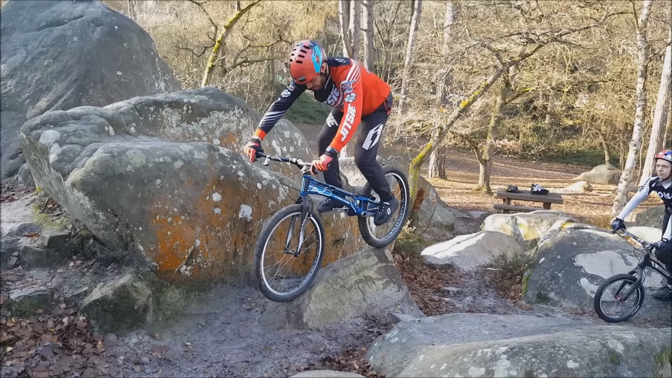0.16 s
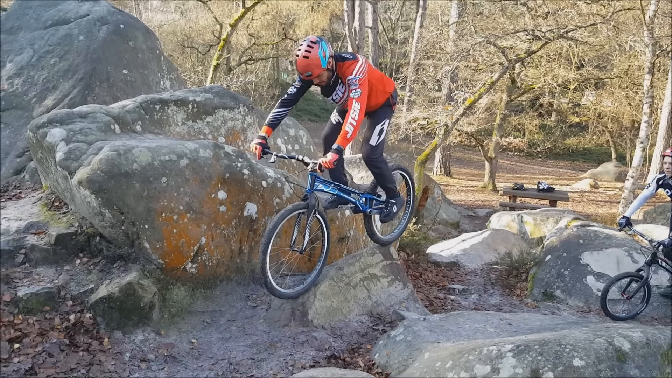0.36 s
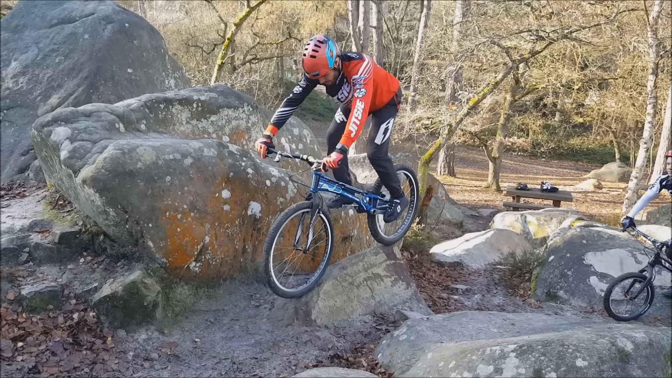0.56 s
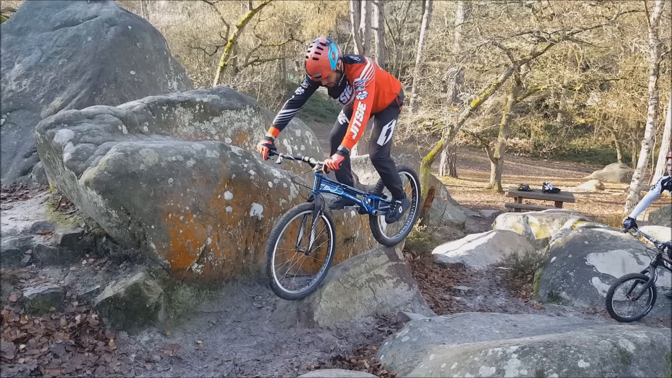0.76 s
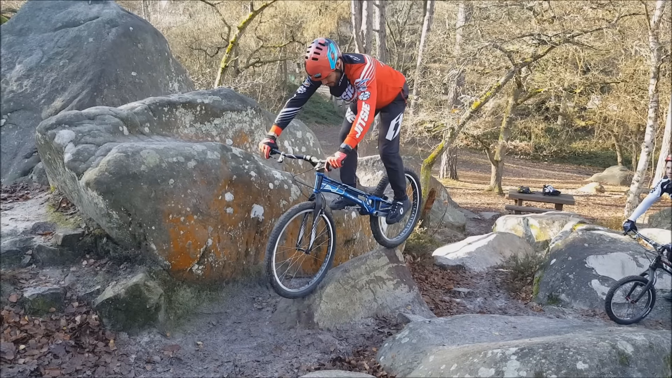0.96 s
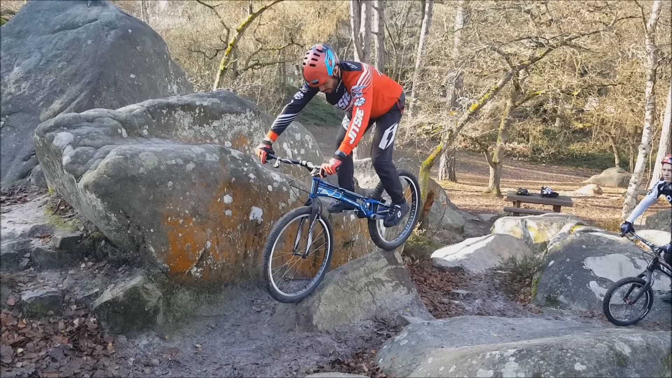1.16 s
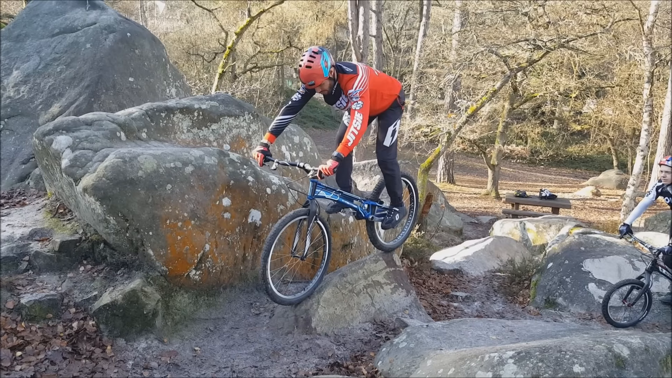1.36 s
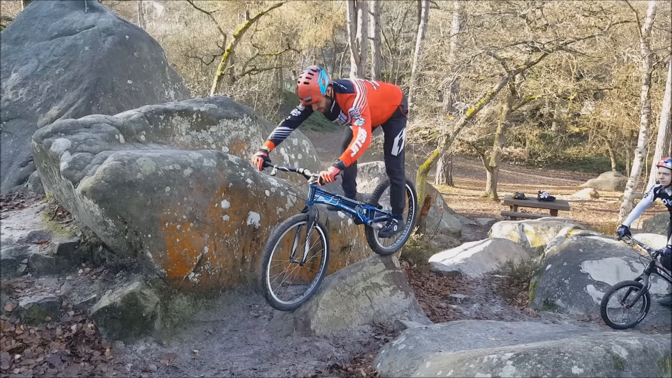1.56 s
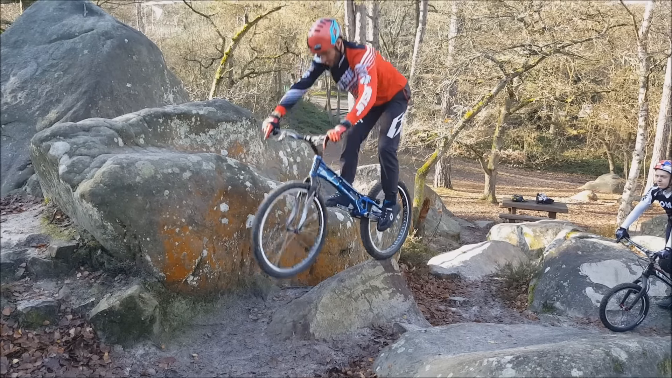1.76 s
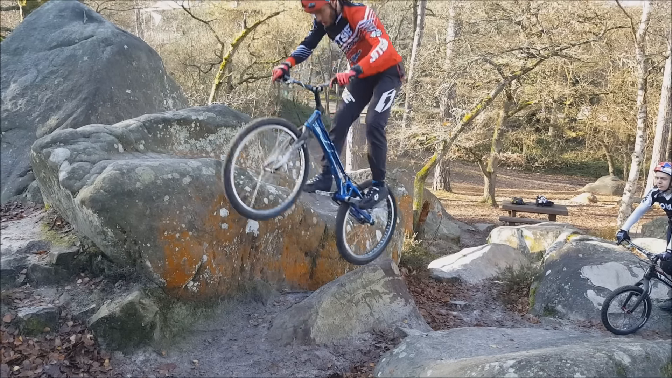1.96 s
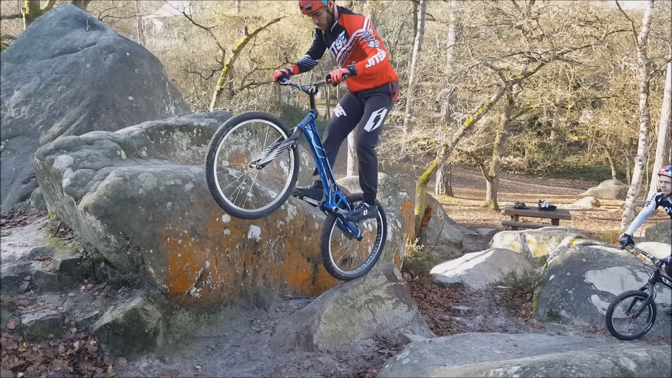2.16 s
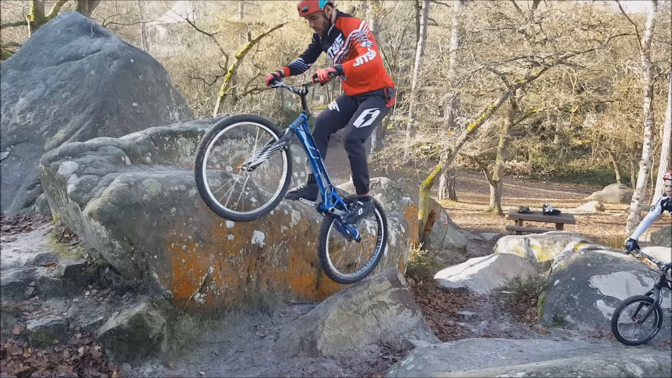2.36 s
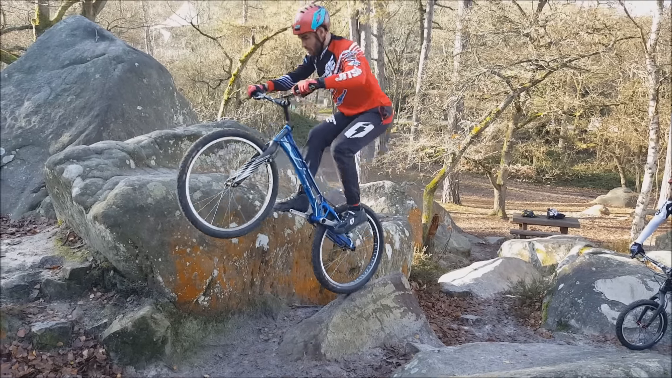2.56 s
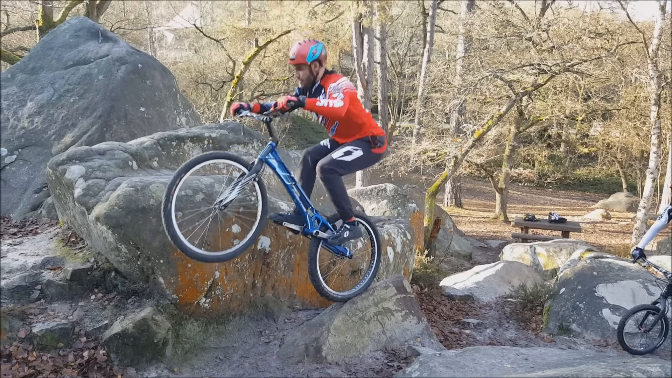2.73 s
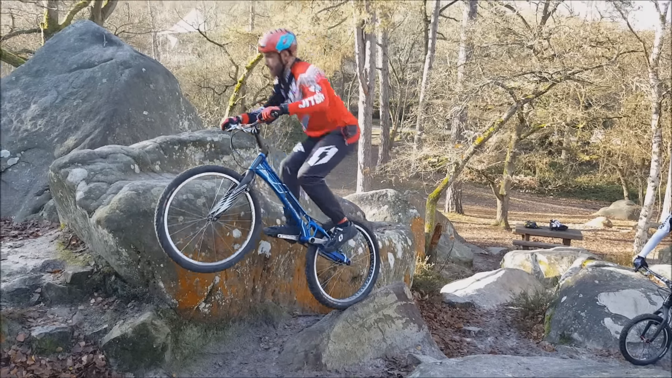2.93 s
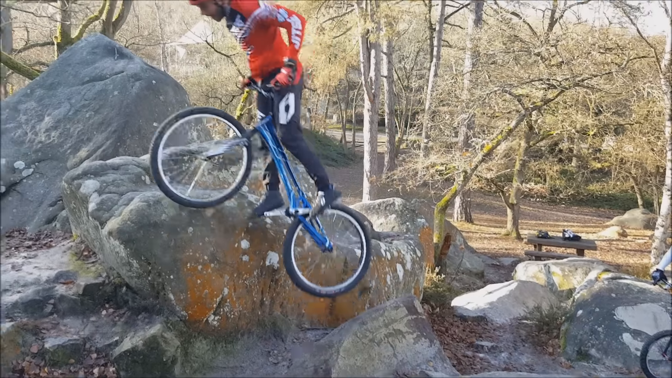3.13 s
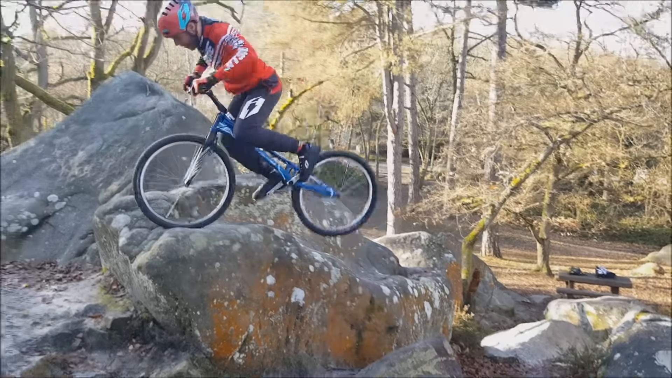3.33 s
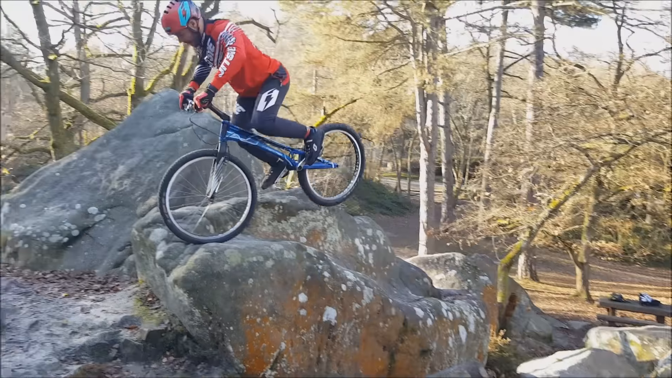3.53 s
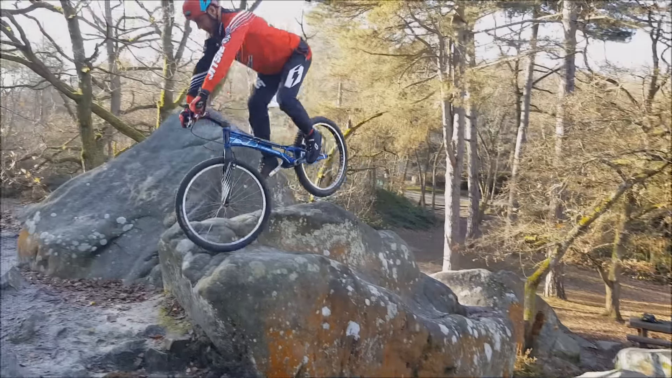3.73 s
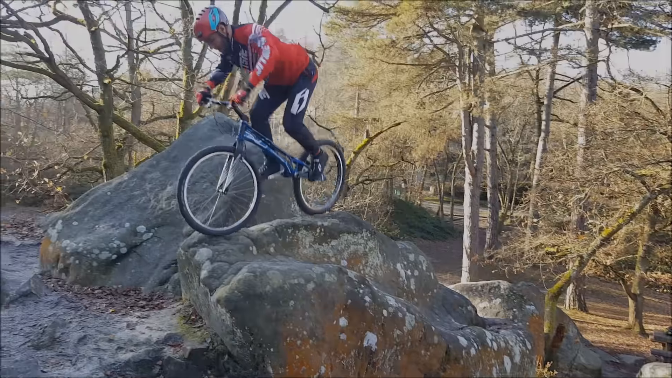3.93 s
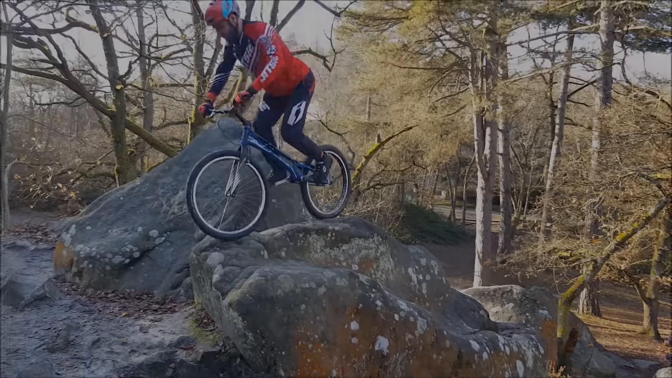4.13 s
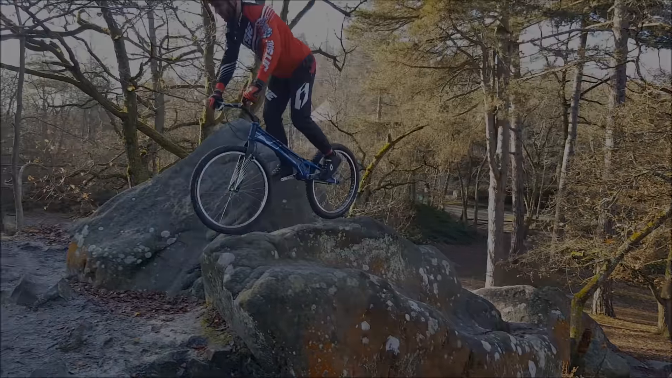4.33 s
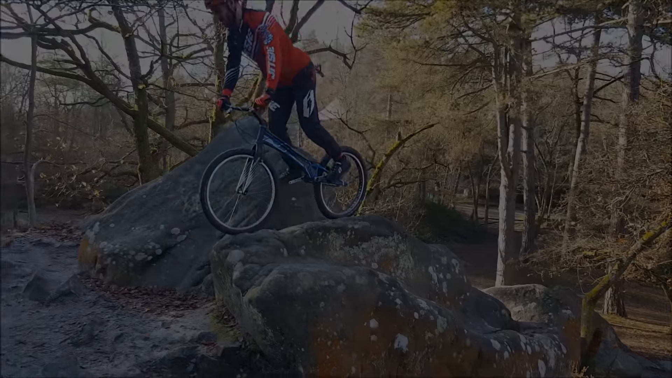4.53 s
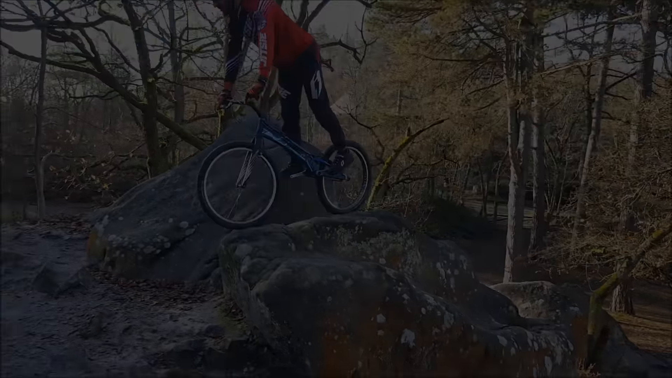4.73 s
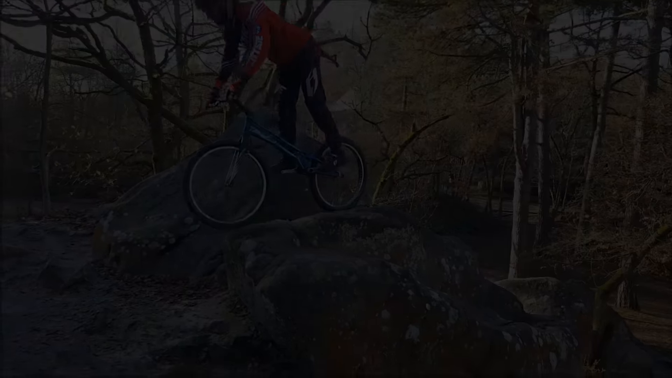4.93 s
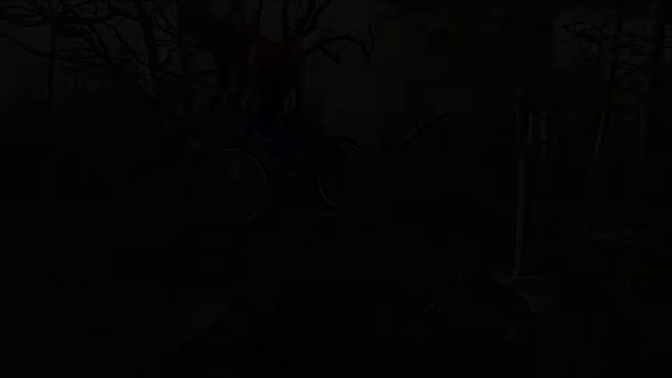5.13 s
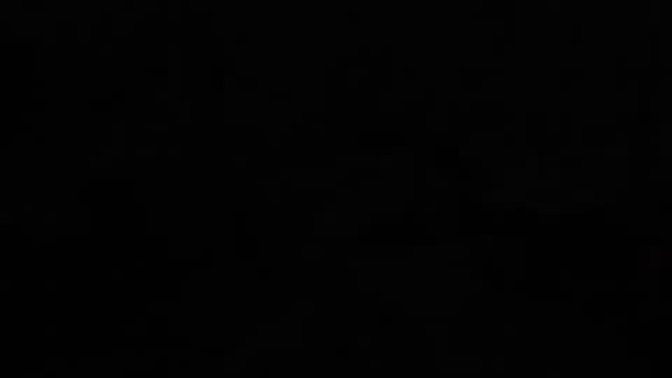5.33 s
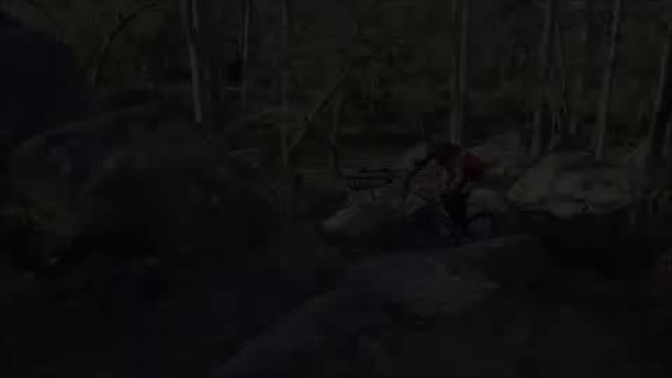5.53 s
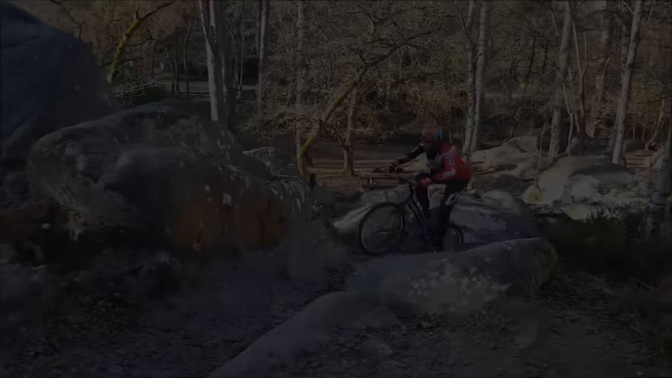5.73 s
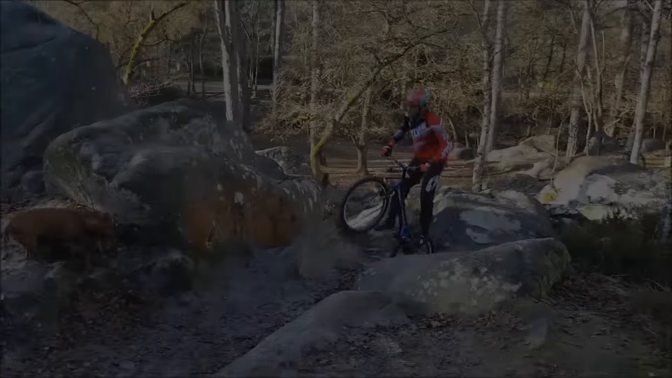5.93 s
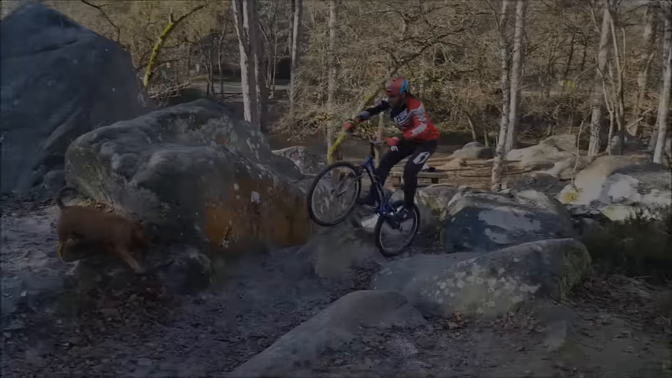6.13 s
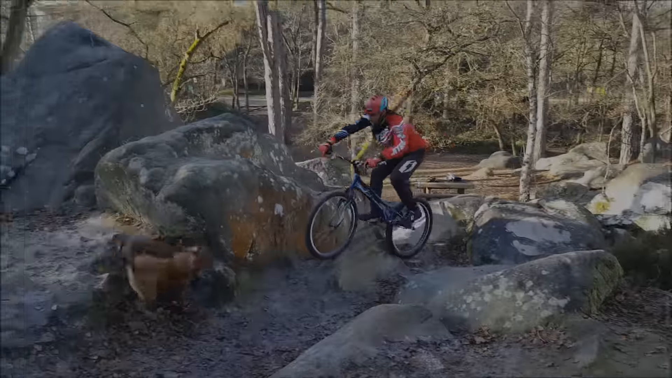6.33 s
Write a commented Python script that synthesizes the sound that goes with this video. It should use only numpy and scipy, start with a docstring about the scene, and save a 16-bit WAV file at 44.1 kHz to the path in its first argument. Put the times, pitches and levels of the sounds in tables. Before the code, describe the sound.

A few metres away in a quiet forest, a bicycle balances almost silently on rock, then springs: dull tyre knocks, hard rim-brake clacks, a metallic ringing wheel, chain and cable rattle. A second hop lands with softer knocks and clatter. The sound cuts briefly to silence, then fades in on rustling dry leaves, scuffs and light tyre knocks. Open air, short scattered echo, close stereo microphone.

```python
"""A trials bicycle hops over boulders in a forest, a few metres away: filtered noise bursts make rim brakes grab with
a clack, tyres knock and scuff, and chain and cables rattle. Decaying sines make the wheels ring, the tyres hum and
small steel parts chink; the freewheel is a train of clicks and short hisses, and forest and dry leaves are shaped noise.
The sound is cut off, then fades in on a second take-off where tyres and a trotting dog stir dry leaves."""
import sys
import numpy as np
from scipy import signal
from scipy.fft import rfft, irfft, next_fast_len
from scipy.io import wavfile
from scipy.ndimage import uniform_filter1d, map_coordinates

SR = 44100
rng = np.random.default_rng(int(sys.argv[2]) if len(sys.argv) > 2 else 0)


def int16_out(signal):
    """Quantize to a 16-bit WAV file."""
    q = np.round(np.clip(np.atleast_2d(signal).T, -1, 1) * 32767)
    wavfile.write(sys.argv[1], SR, q.astype(np.int16))


N = 286209


def amp(db):
    """Logarithmic level: decibels to gain."""
    return 10 ** (np.asarray(db) / 20)


def unit(x):
    """Normalisation by effective value: scaled to rms 1."""
    return x / np.sqrt(np.mean(x ** 2) + 1e-20)


def peaked(x):
    """Short-time level: scaled so that the loudest 300 samples have rms 1."""
    return x / np.sqrt(uniform_filter1d(np.mean(x ** 2, axis=0), size=300).max())


def along(points, hz):
    """Interpolation of (Hz, value) points on a logarithmic frequency axis."""
    f, v = np.transpose(points)
    return np.interp(np.log(hz + 1), np.log(f + 1), v)


def curves(table):
    """Linear interpolation in time: one value per sample for each column after the time."""
    s, *cols = np.transpose(table)
    return [np.interp(np.arange(N) / SR, s, c) for c in cols]


def filtered(x, response):
    """Linear filtering: the spectrum of x times a response of frequency."""
    m = next_fast_len(x.shape[-1] + 4096)
    spectrum = rfft(x, m) * response(np.fft.rfftfreq(m, 1 / SR))
    return irfft(spectrum, m)[..., :x.shape[-1]]


def resonance(centre_hz, width_hz):
    """Simple damped oscillator: a causal band of peak gain 1."""
    return lambda f: 1j * f * width_hz / (centre_hz ** 2 - f * f + 1j * f * width_hz)


def add(track, s, sound):
    """Superposition: mixes a sound into a track from time s."""
    part = track[:, max(round(s * SR), 0):][:, :sound.shape[1]]
    part += sound[:, :part.shape[1]]


def burst(t, rise, t60, grain, wide):
    """Shot noise: a volley of tiny impacts builds up and dies away; the two ears share most of it if wide < 1."""
    swell = np.sin(np.pi / 2 * np.minimum(t / max(rise, .001), 1)) ** 2
    decay = amp(-60 * np.maximum(t - 1.215 * rise, 0) / max(t60, .005))
    sizes = np.exp(grain * unit(uniform_filter1d(rng.standard_normal(len(t)), size=30)))
    mid, side = swell * decay * sizes * rng.standard_normal((2, len(t)))
    return np.array([mid + wide * side, mid - wide * side])


# Likeness of the two ears in broad noise. Each row: frequency in Hz, left-right correlation.
EAR_LIKENESS = [(40, 0.58), (80, 0.97), (150, 0.96), (550, 0.82), (1650, -0.33), (4970, 0.14),
                (15000, -0.18)]


def rush(spectrum, patchy_db, grain):
    """Turbulent noise of rms 1: a diffuse stereo field with patches of random gain and a crackle."""
    crackle = np.exp(grain * unit(uniform_filter1d(rng.standard_normal(N), size=40)))
    z = signal.stft(crackle * rng.standard_normal((2, N)), nperseg=512)[2]
    patches = uniform_filter1d(rng.standard_normal(z.shape[1:]), size=6, axis=0)
    patches = uniform_filter1d(patches, size=10, axis=1)
    pair = signal.istft(z * amp(patchy_db * unit(patches)), nperseg=512)[1][:, :N]

    def mid_side_response(hz):
        # the angle that gives mid and side the wanted correlation
        turn = np.arccos(np.clip(along(EAR_LIKENESS, hz), -1, 1)) / 2
        return amp(along(spectrum, hz)) * [np.cos(turn), np.sin(turn)]

    mid, side = filtered(pair, mid_side_response)
    return unit(np.array([mid + side, mid - side]))


# Far background. Each row: time in seconds, rumble level in dB, air level in dB.
BACKGROUND_LEVELS = [(0, -55, -60), (.7, -55.5, -58), (1.5, -56, -62), (2, -53.5, -50), (2.8, -57, -59.5),
                     (3.5, -56.5, -55.5), (4.2, -54.5, -57), (5.3, -57.5, -60), (5.9, -56, -64),
                     (6.49, -54.5, -44)]
# Chain, tyres and leaves hissing and crackling close by. Each row: time in seconds, level in dB.
RUSTLE_LEVELS = [(0, -68), (.3, -83.5), (1.05, -67), (1.42, -77.5), (1.68, -63.5), (2.3, -63.5),
                 (2.9, -66.5), (3.4, -50), (3.62, -54.5), (3.75, -67.5), (4.2, -62), (4.6, -66),
                 (5.15, -66), (5.3, -55), (5.83, -67.5), (5.9, -54), (6.15, -50), (6.49, -49)]
# Short steady hisses of the spinning freewheel. Each row: start in seconds, length in seconds, level in dB.
FREEWHEEL_WHIRRS = [(1.43, 0.16, -69), (1.988, 0.14, -50), (3.716, 0.15, -57)]
# Spectra of the far rumble, of air in the branches and of leaves. Each row: frequency in Hz, relative gain in dB.
RUMBLE_SPECTRUM = [(12, -44), (20, -9.5), (53, -1.5), (124, -2.5), (162, -1), (295, -3), (344, -5.5),
                   (600, -19.5), (780, -50), (1320, -120)]
AIR_SPECTRUM = [(240, -34.5), (400, -2.5), (480, -4), (590, -2.5), (890, -7.5), (1030, -4), (1930, -4),
                (2880, -15), (4950, -21), (7000, -27.5), (10000, -35.5), (13000, -27.5), (16000, -29.5)]
LEAF_SPECTRUM = [(1470, -27.5), (2500, 1), (3000, -3.5), (5200, -4.5), (7100, -11.5), (8700, -5),
                 (10100, -9.5), (12600, -5), (14000, -7), (16000, -13.5)]
WHIRR_EDGE_S = .02


def forest():
    """Noise of many small sources: far rumble, air in the branches, and crackle and freewheel hiss close by."""
    rumble_db, air_db = curves(BACKGROUND_LEVELS)
    rustle_db, = curves(RUSTLE_LEVELS)
    t = np.arange(N) / SR
    whirr = np.zeros(N)
    for s, length, db in FREEWHEEL_WHIRRS:
        inside_s = np.minimum(t - s, s + length - t)
        whirr += amp(db) * np.clip(inside_s / WHIRR_EDGE_S, 0, 1)
    rumble = amp(rumble_db) * rush(RUMBLE_SPECTRUM, patchy_db=0.0, grain=0.07)
    air = amp(air_db) * rush(AIR_SPECTRUM, patchy_db=0.0, grain=0.061)
    close = (amp(rustle_db) + whirr) * rush(LEAF_SPECTRUM, patchy_db=1.0, grain=0.3)
    return rumble + air + close


# In the four tables of hits, levels are relative and treble is relative to the clatter.
# Tyres knocking on rock. Each row: start in seconds, level in dB, pitch in Hz, t60 in seconds, treble in dB.
TYRE_KNOCKS = [(.033, -40.5, 1350, 0.044, -18), (1.695, -16, 650, 0.11, -29.5),
               (1.773, -19.5, 1050, 0.13, -20.5), (1.783, -22.5, 1135, .073, -17.5),
               (3.348, -21, 884, 0.064, -23.5), (3.442, -29.5, 555, .11, -26.5),
               (3.995, -25.5, 848, 0.098, -22), (4.011, -23.5, 1190, .12, -17.5),
               (4.437, -32.5, 914, 0.104, -29), (4.462, -30, 1150, 0.126, -19.5),
               (4.635, -33.5, 1030, .05, -20), (4.66, -22.5, 794, 0.1, -29),
               (5.275, -31, 834, 0.066, -13.5), (5.288, -31, 704, .092, -20), (5.75, -49.5, 553, .091, -21),
               (6.2, -34, 607, 0.22, -30), (6.432, -29, 1100, 0.05, -7.5)]
# Chain and cables rattling on the frame. Each row: start in seconds, level in dB, pitch in Hz, t60 in seconds,
# treble in dB, rise in seconds.
FRAME_RATTLES = [(.113, -38, 1370, 0.21, -9, 0.0079), (1.712, -28.5, 2140, 0.091, -6, .0089),
                 (2.15, -24, 2790, 0.42, -8.5, 0.0068), (2.714, -42.5, 1320, .061, -2, 0.0015),
                 (3.181, -15.5, 2710, .17, -8.5, .0045), (3.303, -29.5, 716, 0.24, -7, 0.0036),
                 (3.36, -26.5, 2550, .11, 3, 0.0019), (3.949, -41.5, 1340, 0.052, -22, 0.00193),
                 (4.043, -23, 1350, 0.12, -8, .012), (4.1, -50, 3560, .95, -25, 0.1),
                 (4.374, -32, 2900, 0.11, 5, .014), (5.23, -37, 1104, 0.084, -3, 0.068)]
# Tyres scuffing grit and leaves. Each row: start in seconds, level in dB, pitch in Hz, t60 in seconds,
# treble in dB, rise in seconds.
TYRE_SCUFFS = [(1.105, -43, 1980, .2, -10.5, .004), (1.59, -43.5, 2100, 0.4, -8.5, 0.0073),
               (2.478, -20, 2255, 0.11, -10.5, 0.0052), (3.132, -23, 1100, 0.05, -16.5, .016),
               (3.798, -39, 2410, 0.099, -7.5, 0.015), (3.852, -39, 2070, 0.062, -24, 0.0039),
               (4.27, -29.5, 2184, 0.092, -10, 0.031), (5.892, -39.5, 1500, 0.54, -8, 0.0047),
               (5.94, -36, 1970, 0.21, -15, 0.0041), (6.07, -41, 1756, 0.52, -9.5, .047),
               (6.276, -33, 2350, 0.3, -14, 0.0099), (6.348, -27, 2090, 0.16, -14, 0.018),
               (6.455, -32, 2280, .16, -6, .0077)]
# Rim brakes grabbing. Each row: start in seconds, level in dB, pitch in Hz, t60 in seconds, treble in dB,
# rise in seconds, second pitch in Hz, left-right difference in dB.
BRAKE_GRABS = [(1.857, -11.5, 1026, 0.16, -21.5, .018, 2050, -0.5),
               (1.87, -9.5, 1284, 0.13, -18.5, 0.016, 2700, -2.5),
               (2.119, -4, 3970, 0.059, -12, 0.0078, 5370, -.5),
               (2.143, -14.5, 1510, 0.043, -18.5, 0.017, 2800, -0.5),
               (3.045, -8.5, 757, .12, -13, 0.012, 2000, 0),
               (3.152, -4.5, 1780, 0.078, -9.5, 0.014, 890, -3)]
KNOCK_RISE_S, PAN_DB = .0022, 0.55  # left-right difference, where no brake sets it
KNOCK_RATIO, RATTLE_RATIO, SCUFF_RATIO = 2.05, 1.75, .41  # second pitch over the first
# What each kind shares. Each row: thump in dB for a hit of level -20 dB, its change per dB of level,
# bandwidth of the pitches over their centre, second pitch in dB, clear ping in dB.
GRAB, KNOCK = (-9, -1.3, .15, -5, -21), (-10, -.55, .2, -8, -16)
RATTLE, SCUFF = (-17, .05, .3, -5, -36), (-7, -.05, .33, -.5, -36)


def contacts():
    """Impact classes: every hit with the second pitch, place, thump and bandwidth of its kind."""
    def completed(rows, ratio):
        return [(*row, ratio * row[2], PAN_DB) for row in rows]

    knocks = [(*row, KNOCK_RISE_S) for row in TYRE_KNOCKS]
    kinds = [(BRAKE_GRABS, GRAB), (completed(knocks, KNOCK_RATIO), KNOCK),
             (completed(FRAME_RATTLES, RATTLE_RATIO), RATTLE), (completed(TYRE_SCUFFS, SCUFF_RATIO), SCUFF)]
    hits = []
    for rows, (thump_db, slope, *rest) in kinds:
        for row in rows:
            hits.append((*row, thump_db + slope * (row[1] + 20), *rest))
    return hits


# Spectra of the broad clatter and of the treble fizz. Each row: frequency in Hz, relative gain in dB.
CLATTER_SPECTRUM = [(180, -45.5), (300, -22), (572, -6.5), (861, -5.5), (1120, -6.5), (1250, -8.5),
                    (1500, -5), (1800, -7), (2110, -6), (7000, -26.5), (9100, -50), (15400, -120)]
FIZZ_SPECTRUM = [(2350, -14.5), (4000, 0), (4870, -5.5), (7270, -5), (13200, -19), (16000, -16.5)]


def bike():
    """Impact excitation of resonances: each hit clatters around two pitches, thumps the tyre and fizzes."""
    out, t = np.zeros((2, N)), np.arange(SR // 3) / SR
    for s, db, main_hz, t60, treble_db, rise, second_hz, pan_db, thump_db, blur, second_db, ping_db in contacts():
        volley = burst(t, rise, t60, grain=0.14, wide=0.48)

        def pitches(f):
            main = resonance(main_hz, blur * main_hz)(f) ** 2
            return main + amp(second_db) * resonance(second_hz, blur * second_hz)(f) ** 2

        def tyre_boom(f):
            # the air in the tyre booms over a deeper push, which soft landings bring out
            return resonance(230, 170)(f) ** 2 + amp(-17 - .45 * db) * resonance(80, 70)(f) ** 2

        # the pitched knock is over sooner than the broad rattle
        knock = filtered(volley * amp(-30 * np.maximum(t - rise, 0) / t60), pitches)
        # a clear tone at the main pitch, stronger when low
        ping = amp(ping_db - 130 * np.maximum(t - 1.5 * rise, 0) / t60)
        ping = ping * np.minimum(t / rise, 1) * 900 / main_hz
        knock = knock + ping * np.sin(2 * np.pi * (main_hz * t + rng.random()))
        rattle = filtered(volley, lambda f: amp(along(CLATTER_SPECTRUM, f)))
        clatter = peaked(0.81 * rattle + 1.3 * knock)
        thump = peaked(filtered(volley[[0, 0]], tyre_boom))
        # the fizz lasts a little longer
        fizz = burst(t, 1.1 * rise, 1.2 * t60, grain=0.3, wide=0.56)
        fizz = peaked(filtered(fizz, lambda f: amp(along(FIZZ_SPECTRUM, f))))
        sound = clatter + amp(thump_db) * thump + amp(treble_db) * fizz
        add(out, s, amp(db - 9 + np.array([[pan_db], [-pan_db]]) / 2) * sound)
    return out


# Reverberation among trees. Each row: frequency in Hz, t60 in seconds.
TREE_DECAY = [(200, 0.77), (1800, 0.36), (5500, 0.38)]


def trees(x):
    """Reverberation: rocks and trunks scatter sound back; each frequency decays at its own speed."""
    hz, t, z = signal.stft(rng.standard_normal((2, SR // 2)), SR, nperseg=256)
    decay = amp(-60 * t / along(TREE_DECAY, hz)[:, None])
    # little side signal in the bass: it is alike at both ports
    mid_side = np.array([1 + 0 * hz, hz / (hz + 700)])[:, :, None]
    mid, side = signal.istft(z * decay * mid_side, SR, nperseg=256)[1]
    tail = np.array([mid + side, mid - side])
    delayed = np.pad(x, ((0, 0), (400, 0)))  # samples before the first echo
    return signal.fftconvolve(delayed, tail / np.linalg.norm(tail[0]), axes=1)[:, :N]


# The camera body shades its ports. Each row: frequency in Hz, left-right difference in dB.
PORT_SHADING = [(60, -0.5), (180, 0.5), (550, 2), (1650, -0.5), (4970, -2.5), (15000, 6.5)]


def ports(x):
    """Diffraction: two close ports differ little in the bass, more in the treble, where the camera body shades them."""
    mid, side = (x[0] + x[1]) / 2, (x[0] - x[1]) / 2
    side = filtered(side, lambda f: 1.6 * f * f / (f * f + 600 ** 2))
    pair = np.array([mid + side, mid - side])
    return filtered(pair, lambda f: amp(along(PORT_SHADING, f) / 2 * [[1], [-1]]))


# The freewheel spinning. Each row: start in seconds, end in seconds, first and last clicks per second,
# relative level in dB.
FREEWHEEL_SPINS = [(1.438, 1.55, 48, 74, -50), (4.794, 5.017, 46, 37, -51)]
# Spectrum of one click. Each row: frequency in Hz, relative gain in dB.
PAWL_SPECTRUM = [(710, -28.5), (1200, -25), (1850, -6), (2000, -4), (3180, -12.5), (4800, -8), (6580, -15),
                 (12200, -12.5), (16000, -12.5)]
PAWL_JITTER_S, PAWL_SCATTER_DB = 0.0013, 3.8  # standard deviations


def freewheel():
    """Periodic impacts: pawls snap over ratchet teeth, a little unevenly, at a gliding rate."""
    out, t = np.zeros((2, N)), np.arange(SR // 10) / SR
    for start, end, first, last, db in FREEWHEEL_SPINS:
        span = np.arange(start, end, 1 / SR)
        teeth = np.cumsum(np.linspace(first, last, len(span))) / SR
        for s in np.interp(np.arange(teeth[-1]), teeth, span):
            click = burst(t, .002, .08, grain=0.47, wide=1.0)
            click = peaked(filtered(click, lambda f: amp(along(PAWL_SPECTRUM, f))))
            when = s + PAWL_JITTER_S * rng.normal()
            add(out, when, amp(db - 5.5 + PAWL_SCATTER_DB * rng.normal()) * click)
    return out


# Landings after which a tyre hums on. Each row: start in seconds, level in dB, pitch in Hz.
TYRE_HUMS = [(1.775, -33, 205), (1.87, -30, 205), (2.48, -40, 90), (3.065, -35, 205), (3.35, -37, 75),
             (4.0, -33, 90)]
HUM_RISE_S, HUM_T60_S = .015, .26


def tyre():
    """Damped free vibration: a low hum swells and dies."""
    out, t = np.zeros((2, N)), np.arange(SR // 3) / SR
    for s, db, hz in TYRE_HUMS:
        envelope = (1 - np.exp(-t / HUM_RISE_S)) * amp(db - 60 * t / HUM_T60_S)
        hum = envelope * np.sin(2 * np.pi * (hz * t + rng.random()))
        add(out, s, np.array([hum, hum]))
    return out


# Blows that set a wheel ringing. Each row: start in seconds, relative level in dB, settled pitch ratio.
WHEEL_BLOWS = [(1.78, -30.5, 1.02), (1.876, -30, 1.7), (2.122, -7, 1.001), (2.15, -13, 1.035),
               (3.056, -24, 0.66), (3.164, -5.5, .94), (3.19, -22, 0.96)]
# Modes of rim and spokes. Each row: frequency in Hz at ratio 1, relative level in dB,
# relative decay time of the lasting part.
WHEEL_MODES = [(486, -19.5, 0.71), (681, -17.5, 1), (900, -16, 0.39), (930.7, 1, 0.16), (968, -7, 0.8),
               (1502, -14, 0.11), (1837, -1, 0.2), (1955, -3, .45), (2160, -12.5, 0.41), (2710, -18, 0.35)]
CLIMB, FIRST_T60_S = .022, 0.11  # share by which the pitch climbs as the load comes off; damped first decay


def wheels():
    """Modal damping: brake pad and tyre damp the ring fast at first; a faint, fluttering rest lasts longer."""
    out, t = np.zeros((2, N)), np.arange(SR * 3 // 4) / SR
    for s, db, ratio in WHEEL_BLOWS:
        cycles = np.cumsum(ratio * (1 - CLIMB * np.exp(-t / 0.054))) / SR
        for hz, level_db, t60 in WHEEL_MODES:
            # a random walk of the phase, with an offset between the ears
            waver = 1.7 * np.cumsum(rng.standard_normal(len(t))) * np.sqrt(40 / SR)
            phase = 2 * np.pi * hz * cycles + waver + rng.normal(0, 0.22, (2, 1))
            flutter_db = 5 * map_coordinates(rng.standard_normal(40), [45 * t], mode="wrap")
            rest = amp(-30 + flutter_db - 60 * t / (2.5 * t60))
            decay = amp(-60 * t / FIRST_T60_S) + rest
            swell = (1 - np.exp(-t / 0.0023)) * amp(level_db + rng.normal(0, 1.5)) * decay
            add(out, s, amp(db - 7) * swell * np.sin(phase))
    return out


CUT_S, CUT_DROP_DB, CUT_DB_PER_S, SILENT_S = 5.304, -6, -580, 5.34  # a drop, a quick fall, then nothing
FADE_IN_S, FADE_LENGTH_S, FADE_POWER = 5.652, 0.18, 0.96


def fader():
    """Gain envelope: an editor's cut to silence and fade-in."""
    t = np.arange(N) / SR
    fall = amp(CUT_DROP_DB + CUT_DB_PER_S * np.maximum(t - CUT_S, 0)) * (t < SILENT_S)
    cut = np.where(t < CUT_S, 1, fall)
    return cut + np.clip((t - FADE_IN_S) / FADE_LENGTH_S, 0, 1) ** FADE_POWER


# Small bright chinks of steel. Each row: start in seconds, relative level in dB, pitch in Hz.
STEEL_CHINKS = [(5.8531, -35, 9340), (5.8651, -43, 6220), (5.8946, -43, 12790), (6.1608, -40.5, 8300)]
# Modes of the steel part. Each row: pitch ratio, relative level in dB, t60 in seconds.
STEEL_MODES = [(1, 3.5, 0.017), (.68, -16.5, 0.072), (1.25, -17.5, .015)]


def chinks():
    """Free vibration in modes: a small steel part rings briefly, to the right."""
    out, t = np.zeros((2, N)), np.arange(SR // 10) / SR
    for s, db, hz in STEEL_CHINKS:
        ring = np.zeros(len(t))
        for ratio, level_db, t60 in STEEL_MODES:
            ring += amp(level_db - 60 * t / t60) * np.sin(2 * np.pi * hz * ratio * t)
        tap = 0.23 * burst(t, 0.00092, .012, grain=0.22, wide=.5)
        add(out, s, amp(db + np.array([[-2], [2]])) * (ring + tap))
    return out


def scene():
    """Superposition of the bicycle, its echoes and the forest."""
    near = bike() + wheels() + freewheel() + tyre()
    return ports(near) + amp(-13) * trees(near) + chinks() + forest()


TOP_HZ = 15900


def record(dry):
    """Saturation and band limiting: soft clipping of the hardest blows, the cut and fade, then the band limit."""
    clipped = dry / (1 + np.abs(dry / .95) ** 4) ** (1 / 4)
    return filtered(clipped * fader(), lambda hz: hz < TOP_HZ)


dry = scene()
out = record(dry)
int16_out(out)
```